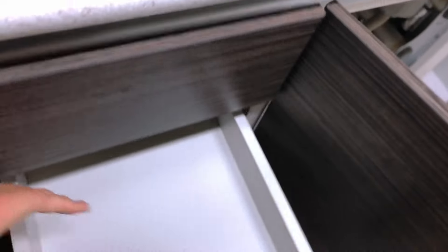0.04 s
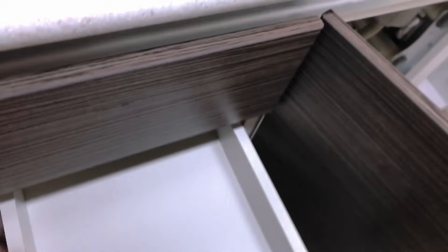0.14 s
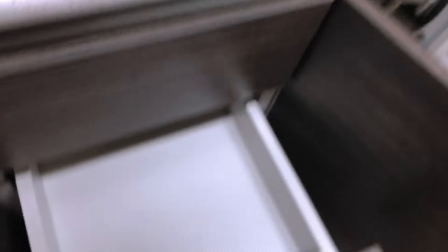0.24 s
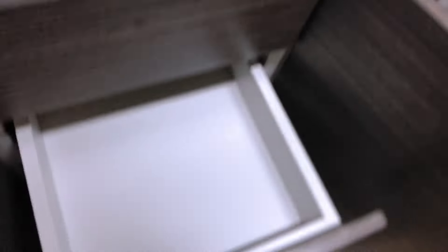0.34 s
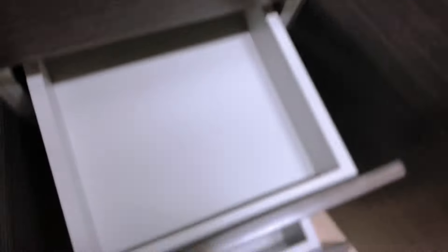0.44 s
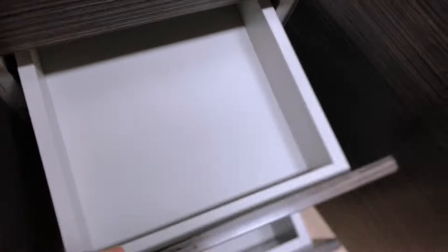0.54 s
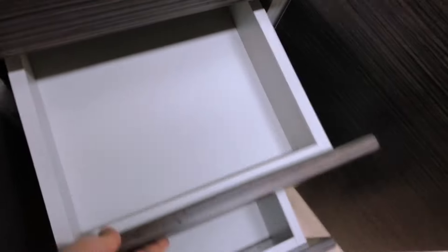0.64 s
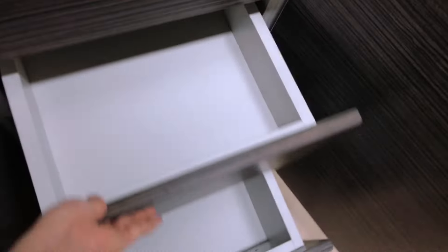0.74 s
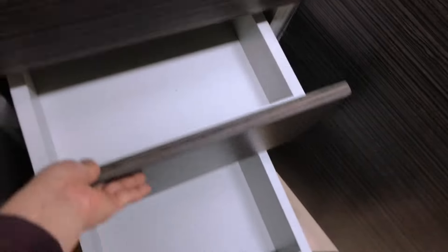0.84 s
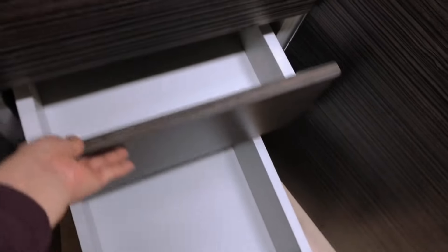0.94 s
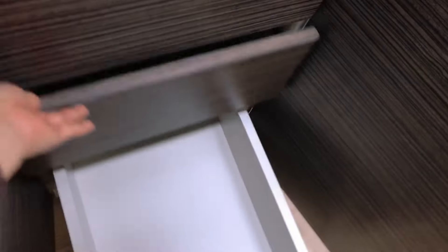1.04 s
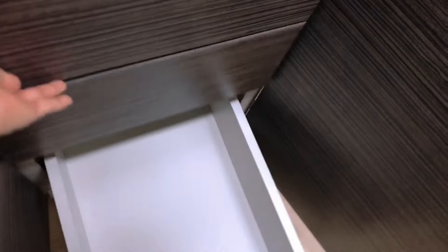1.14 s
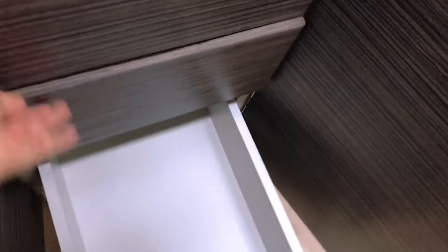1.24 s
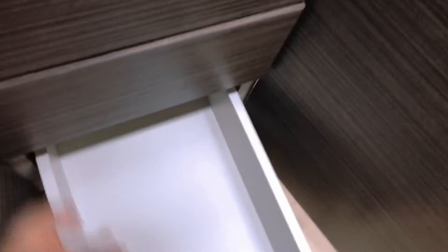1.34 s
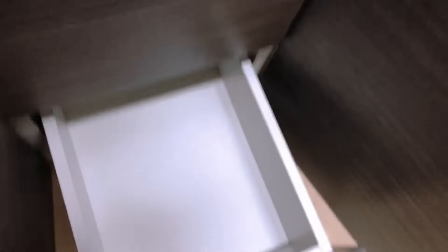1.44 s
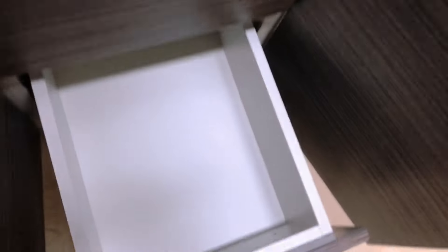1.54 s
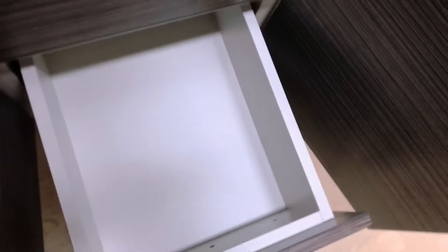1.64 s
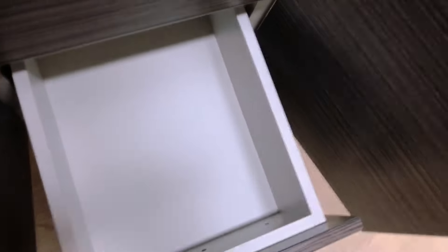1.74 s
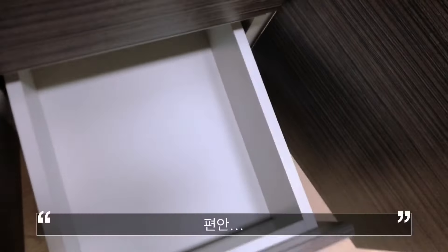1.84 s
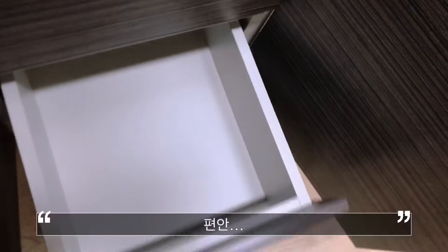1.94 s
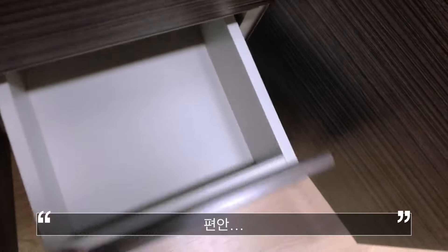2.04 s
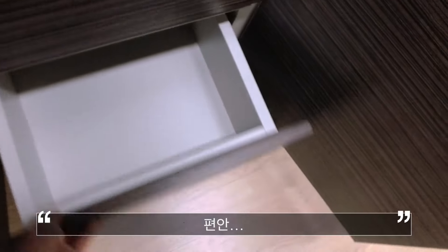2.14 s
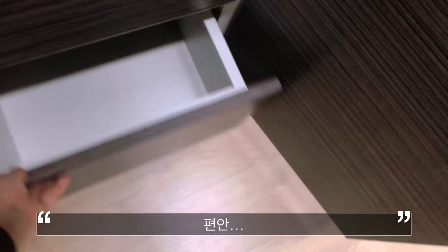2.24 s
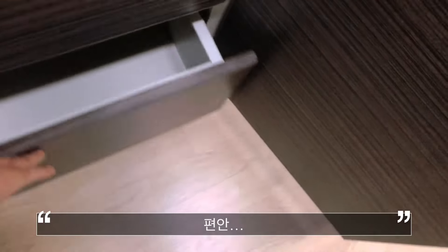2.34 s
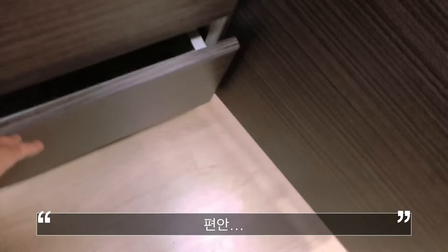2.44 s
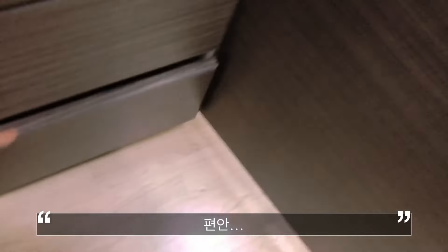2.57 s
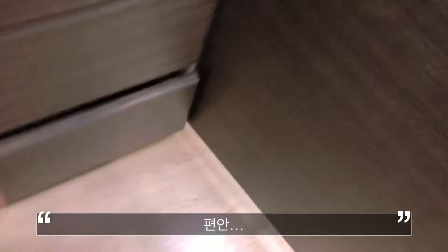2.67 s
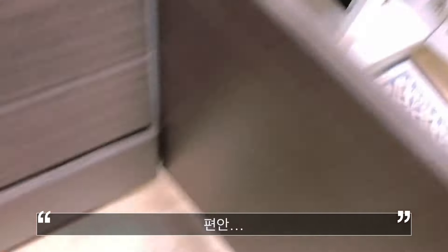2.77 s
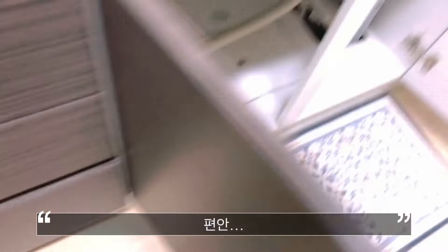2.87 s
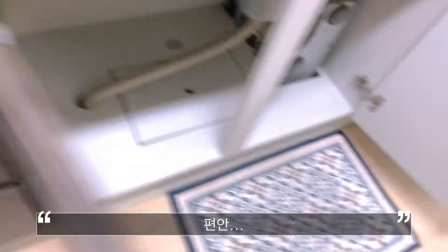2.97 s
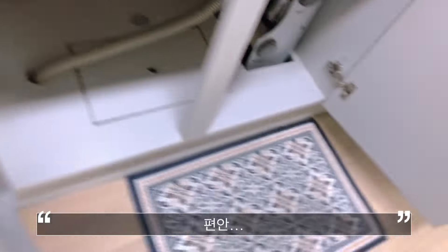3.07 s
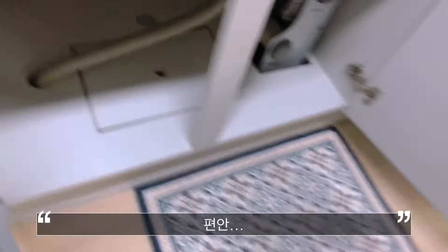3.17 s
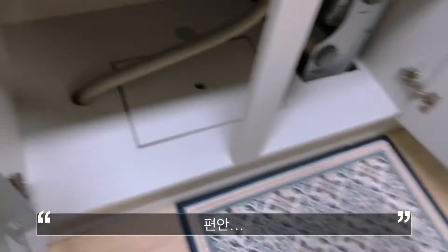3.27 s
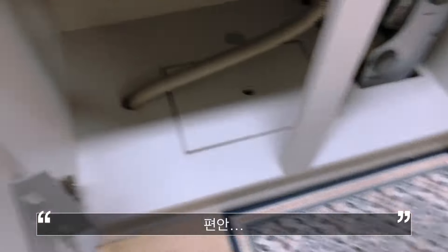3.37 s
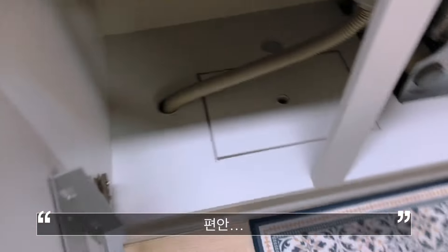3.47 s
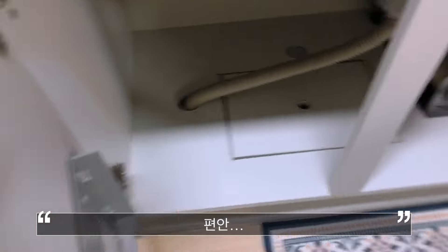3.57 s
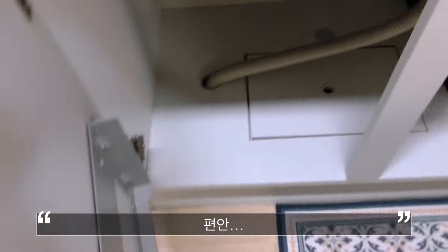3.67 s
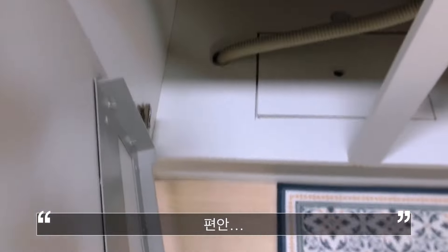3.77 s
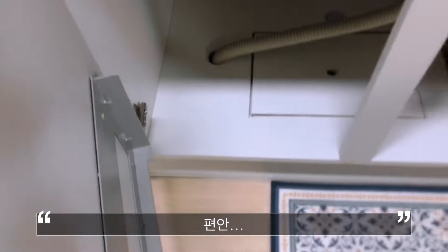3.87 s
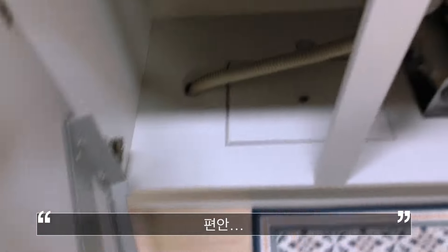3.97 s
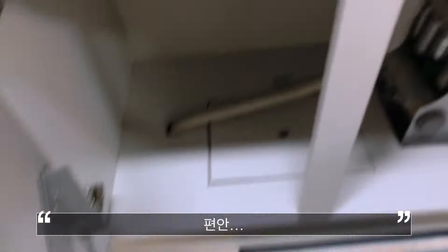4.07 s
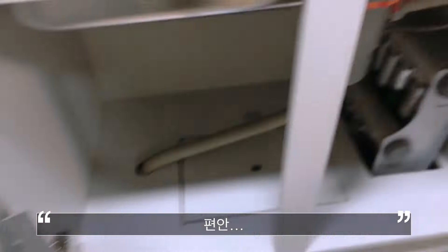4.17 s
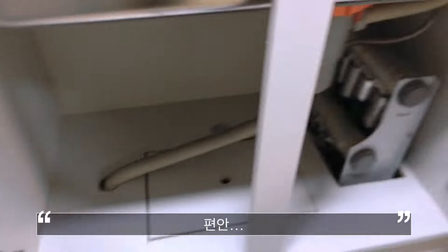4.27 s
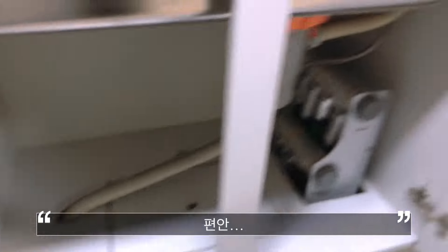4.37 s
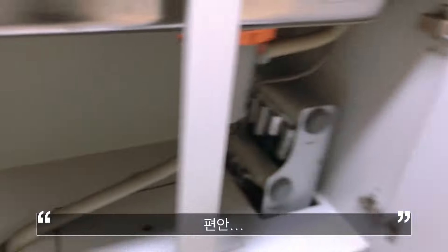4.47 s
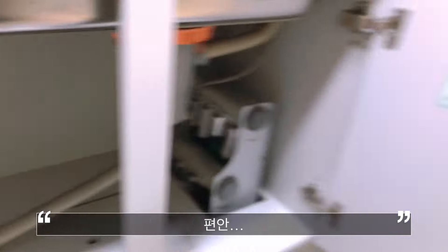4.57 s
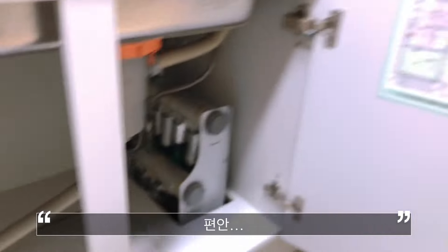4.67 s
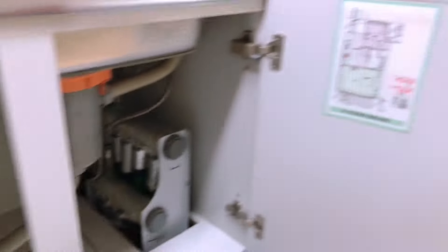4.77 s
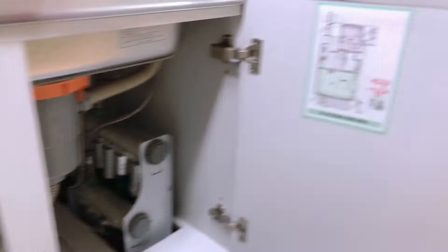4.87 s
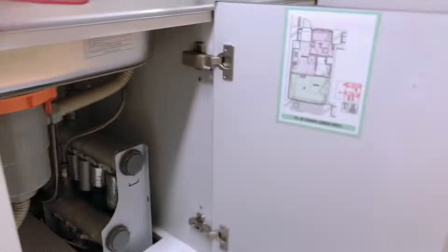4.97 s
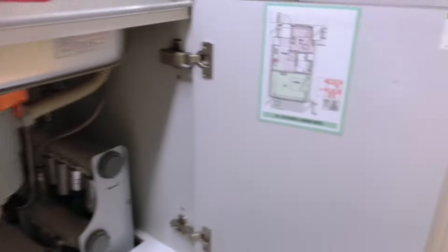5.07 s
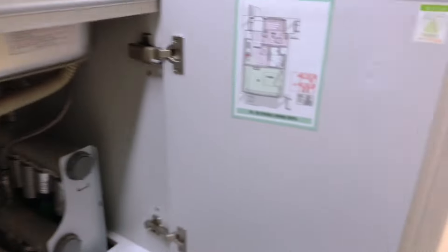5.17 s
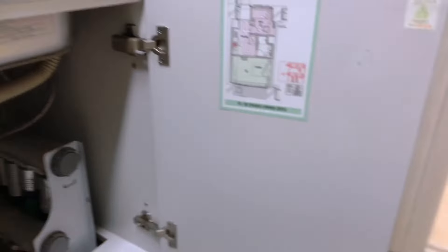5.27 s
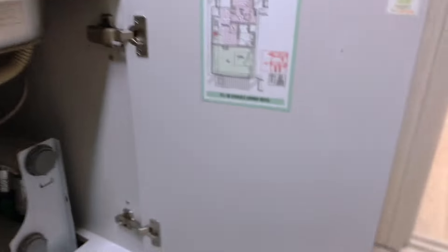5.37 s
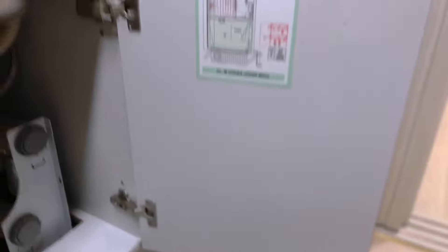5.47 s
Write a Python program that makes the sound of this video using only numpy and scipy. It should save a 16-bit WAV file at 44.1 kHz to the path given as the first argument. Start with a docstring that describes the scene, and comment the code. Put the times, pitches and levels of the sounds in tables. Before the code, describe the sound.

Close-up drawer closing in a bare apartment: rolling rumble, runner ticks, loud bangs of panel and metal, then quiet rustling and room hum.

```python
"""Kitchen drawers pushed shut

Three empty drawers are pushed shut by hand, close to a phone, in a bare apartment. Rollers bump along the
runners (dense impulses into modes), runners tick and fronts slam (struck steel and panel modes, noise cracks).
Feet and clothes rustle (grainy noise) over the hum of the flat (coloured noise, wavering tones).
"""
import sys
import numpy as np
from scipy import signal
from scipy.fft import rfft, irfft
from scipy.io import wavfile
from scipy.ndimage import uniform_filter1d

SR = 44100
rng = np.random.default_rng(int(sys.argv[2]) if len(sys.argv) > 2 else 0)


def gain_from_decibels(decibels):
    """Convert decibel values to linear amplitude factors."""
    exponent = np.asarray(decibels, float) / 20
    return 10 ** exponent


def int16_out(signal):
    """Quantize to a 16-bit WAV file."""
    q = np.round(np.clip(np.atleast_2d(signal).T, -1, 1) * 32767)
    wavfile.write(sys.argv[1], SR, q.astype(np.int16))


N = 242991
T_S = np.arange(N) / SR

# hum of the flat, spectral shape: freq_hz, density_db_per_hz
FLAT_SPECTRUM = [(18, -14), (30, 7.5), (64, 4), (138, -7.5), (189, -6.5), (394, -4.5), (499, -16.5),
                 (600, -16), (889, -19), (1010, -16.5), (2230, -22.5), (2610, -26.5), (3220, -31),
                 (14000, -43.5), (16000, -43.5)]
FLAT_RMS_DB = -51.5
# steady appliance tones: freq_hz, rms_db
APPLIANCE_TONES = [(183, -63.5), (608, -70), (2584, -75)]

# brushes of feet and clothes: start_s, length_s, peak_level_db, fine_treble_re_level_db
BRUSHES = [(0.0, 0.37, -59.5, -14), (0.547, 0.65, -65.5, -8.5), (0.782, 0.76, -59, -14),
           (1.534, 0.29, -65, 4), (1.765, 0.75, -61.5, -23), (2.206, 0.3, -63.5, -21),
           (2.502, 0.21, -52, -21.5), (2.856, 0.27, -62.5, -5), (3.142, 0.14, -49, -8.5),
           (3.346, 0.091, -61.5, -4.5), (3.442, 0.17, -65, 2), (3.806, 0.17, -68, -7),
           (4.035, .17, -51, -5), (4.201, 0.14, -64, -7), (4.36, 0.31, -67, -11.5), (4.72, 0.076, -78, -8),
           (4.835, 0.25, -70.5, -9), (5.06, 0.099, -76, -10), (5.325, 0.2, -68.5, -27)]
# cloth, spectral shape: freq_hz, density_db_per_hz
CLOTH_SPECTRUM = [(710, -39), (1200, -12), (1660, 8.5), (2860, 5), (3010, 9.5), (3220, 8.5), (9310, -0.5),
                  (14400, -25), (16000, -27.5)]
# footfalls and shifts of weight: start_s, peak_rumble_db
FOOTFALLS = [(0.66, -60), (1.47, -60), (2.04, -47), (2.23, -43), (2.98, -52.5), (3.5, -50), (4.34, -54.5),
             (5.06, -58)]

# kitchen reverberation: freq_hz, t60_s, tail_re_direct_db (before the wet_db of each sound)
KITCHEN_DECAY = [(60, 1, 5), (155, 0.22, -16), (400, 0.24, 4), (1500, 0.25, 0), (5000, 0.2, -2.5),
                 (14000, 0.21, -3)]
# chipboard panel modes: freq_hz, relative_db, t60_s
PANEL_MODES = [(81.3, 0.5, 0.18), (101, -1.5, 0.22), (126.5, -1, 0.27), (155, 1.5, .15), (193.3, 3.5, 0.11),
               (226, -13, 0.43), (244.3, 2.5, 0.061), (289.6, 5.5, 0.085), (312.7, -6, 0.21),
               (363, 4, 0.083), (444, 3, 0.077), (517, -3, 0.064), (626.5, -10, 0.19), (736, -7, 0.027)]
# steel runner modes: freq_hz, relative_db, t60_s
RUNNER_MODES = [(851, -5, 0.056), (890, -2, 0.0047), (972, 4, 0.011), (1265, 1, 0.017), (1400, 3.5, 0.023),
                (1500, -1, 0.04), (1622, -5.5, 0.036), (2010, -2.5, 0.011), (2079, -8, 0.014),
                (2055, 4, 0.022), (2480, 3.5, 0.013), (2780, -3, 0.038), (3030, 6, 0.0083),
                (3455, -0.5, 0.024), (3880, -1.5, 0.013), (4700, 4.5, 0.0046)]
# crack of a contact, spectral shape before tilt: freq_hz, density_db_per_hz
CRACK_SPECTRUM = [(350, -13), (600, -12), (1470, -15), (1730, -13), (2070, -11.5), (3210, -11),
                  (5870, -14.5), (14700, -27.5), (16000, -49)]

# rollers bearing on the track, one list per stretch: time_s, box_rumble_db, runner_grind_db
ROLL_STRETCHES = [
    [(0.0, -43.5, -45.5), (0.07, -46, -57), (0.27, -43.5, -50), (0.33, -48, -60), (0.4, -50, -73),
     (0.5, -66, -80)],
    [(0.574, -39, -54), (0.64, -53.5, -63), (0.75, -39, -55.5), (0.86, -39, -54), (0.9, -43, -72),
     (0.945, -33.5, -51), (1.03, -40, -56.5), (1.14, -42.5, -50), (1.33, -43.5, -57), (1.41, -75, -84)],
    [(1.52, -41, -53), (1.6, -81, -83), (1.66, -46.5, -74), (1.72, -77, -76)],
    [(1.754, -40, -67), (1.866, -45.5, -77), (1.92, -38.5, -53), (2.11, -39.5, -47), (2.21, -42, -50.5),
     (2.31, -39, -48), (2.44, -46, -66), (2.53, -48, -43), (2.74, -44, -55), (2.84, -75, -89)],
    [(2.91, -55, -67), (3.0, -46, -58), (3.12, -79, -83), (3.2, -74, -71)],
]
# ticks of runners and catches: start_s, ring_peak_db, favoured_ring_hz, crack_db
TICK_EVENTS = [(0.043, -41.5, 3030, -51), (0.2634, -37, 1400, -51.5), (0.32, -45, 2450, -50.5),
               (0.596, -47, 2430, -48), (0.632, -60, 2520, -52.5), (0.71, -65, 1530, -56),
               (0.7557, -35, 3400, -47), (0.833, -43, 2340, -33), (0.888, -56.5, 3190, -40),
               (0.9171, -23.5, 2480, -33.5), (0.9894, -38.5, 2480, -49), (1.042, -31, 3500, -29.5),
               (1.6314, -36.5, 1400, -53), (1.7474, -21, 1620, -68), (1.779, -27.5, 1530, -71),
               (1.8065, -31, 1610, -70), (1.834, -25.5, 1560, -58), (1.912, -30.5, 1500, -66),
               (1.943, -30.5, 1340, -64), (1.977, -37, 1410, -54), (2.0753, -29.5, 1500, -41.5),
               (2.119, -38, 1330, -72), (2.151, -31.5, 2060, -79.5), (2.1854, -30.5, 1400, -36),
               (2.253, -34, 3760, -42), (2.269, -25, 2780, -48), (2.316, -41, 1500, -49),
               (2.33, -33, 3990, -37), (2.374, -33, 1740, -58), (2.511, -43, 1340, -41.5),
               (3.0178, -26, 1903, -58), (5.2951, -48, 2570, -75), (5.412, -40, 3100, -67)]
# slams and heavy knocks: start_s, ring_peak_db, favoured_ring_hz, ring_narrowness_db_per_octave,
# thud_db, favoured_thud_hz, crack_db
KNOCK_EVENTS = [(0.09, -10.5, 1500, 18, -18, 153, -10.5), (0.352, -25.5, 1430, 14, -38.5, 390, -32.5),
                (0.796, -15, 2520, 7, -23.5, 139, -22), (1.157, -9, 1360, 5, -18, 287, -12),
                (1.441, -24, 1870, 2.5, -29.5, 276, -31.5), (1.73, -29.5, 1450, 0, -39.5, 370, -40),
                (2.556, -10.5, 1920, 38, -16.5, 220.5, -12.5), (2.932, -16.5, 2600, 6, -36, 493, -27.5)]


def unit(x):
    """Scale to rms 1."""
    return x / np.sqrt(np.mean(x ** 2))


def at(freq_hz, table):
    """Read a table of (freq_hz, value) on a log-frequency axis."""
    table_hz, value = np.transpose(table)
    return np.interp(np.log(np.maximum(freq_hz, 1)), np.log(table_hz), value)


def colour(x, spectrum):
    """Filter by a spectrum of (freq_hz, db)."""
    gain = gain_from_decibels(at(np.fft.rfftfreq(len(x), 1 / SR), spectrum))
    return irfft(rfft(x) * gain, len(x))


def walk(rate_hz):
    """Random levels held for 1 / rate_hz and slewed twice; spread near 1."""
    hold = int(SR / rate_hz)
    steps = np.repeat(rng.standard_normal(N // hold + 1), hold)
    return 0.65 * uniform_filter1d(uniform_filter1d(steps, hold), hold)[:N]


def curves(rows):
    """Level columns of a (time_s, db, ..) table as gains at every sample."""
    time_s, *levels_db = np.transpose(rows)
    return [gain_from_decibels(np.interp(T_S, time_s, db)) for db in levels_db]


def swell(rows, rise_s):
    """Summed gain of (start_s, peak_db) events that rise for rise_s, then die away exponentially."""
    start_s, peak_db = np.transpose(rows)[:, :, None]
    u = np.maximum(T_S - start_s, 0) / rise_s
    return np.sum(gain_from_decibels(peak_db) * u * np.exp(1 - u), axis=0)


def shaken(re_thud_db, rise_s):
    """Gain of something heavy that every knock sets swaying, in proportion to its thud."""
    start_and_thud = np.array(KNOCK_EVENTS)[:, [0, 4]]
    return swell(start_and_thud + [0, re_thud_db], rise_s)


def flat():
    """Ventilation and far traffic as coloured noise, with a few appliance tones that waver."""
    air = unit(colour(rng.standard_normal(N), FLAT_SPECTRUM)) * gain_from_decibels(FLAT_RMS_DB + 0.27 * walk(2.7))
    tones = 0
    for hz, rms_db in APPLIANCE_TONES:
        tones = tones + gain_from_decibels(rms_db + 1.17 * walk(5.9)) * np.sqrt(2) * np.sin(2 * np.pi * hz * T_S)
    return air + tones


def person():
    """Fabric and soles brush in fine grains; the floor gives under shifting weight and after each knock."""
    peak_place, edge_power = 0.4, 1.52  # fraction of a brush, steepness of its edges
    stir_db, standing_db = -85, -65  # steady cloth and floor levels under the events

    grains = rng.standard_normal(N) * gain_from_decibels(2.0 * walk(250) + 0.55 * walk(30))
    fine = colour(grains, [(5000, -12.0), (9000, -6.5), (12000, -4.5), (15000, -3), (16500, -10)])
    floor = colour(rng.standard_normal(N), [(15, -42.5), (30, -11.0), (45, 5.5), (65, -1), (100, -4), (200, -85.0)])

    start_s, length_s, level_db, fine_db = np.transpose(BRUSHES)[:, :, None]
    # warp time so that the half sine peaks at peak_place
    u = np.clip((T_S - start_s) / length_s, 0, 1) ** (np.log(0.5) / np.log(peak_place))
    brush = gain_from_decibels(level_db) * np.abs(np.sin(np.pi * u)) ** edge_power
    cloth_gain = brush.sum(axis=0) + gain_from_decibels(stir_db)
    fine_gain = (brush * gain_from_decibels(fine_db)).sum(axis=0) + gain_from_decibels(stir_db - 8.5)

    weight = swell(FOOTFALLS, rise_s=0.074) + shaken(re_thud_db=-15.5, rise_s=0.056) + gain_from_decibels(standing_db)
    return cloth_gain * unit(colour(grains, CLOTH_SPECTRUM)) + fine_gain * unit(fine) + weight * unit(floor)


def kitchen(x, wet_db=0, size=16384):
    """Bare walls: a diffuse tail in octave bands, each with its own decay; wet_db offsets the tail level."""
    t_s = np.arange(size) / SR
    freq_hz = np.maximum(np.fft.rfftfreq(size, 1 / SR), 1)
    centre_hz = 62.5 * 2 ** np.arange(9)[:, None]
    share = np.clip(1 - np.abs(np.log2(freq_hz / centre_hz)), 0, 1)
    table = np.array(KITCHEN_DECAY)
    t60_s = at(centre_hz, table[:, :2])
    # the root makes the level that of the whole decay's energy
    gain = gain_from_decibels(at(centre_hz, table[:, ::2])) * np.sqrt(2 * np.log(1000) / t60_s / SR)
    bands = irfft(rfft(rng.standard_normal(size)) * share, size) * gain * 1000. ** (-t_s / t60_s)
    # reflections build up over 5.7 ms; a negative wet_db makes the sound drier
    response = gain_from_decibels(wet_db) * bands.sum(axis=0) * np.clip(t_s / 0.0057, 0, 1)
    response[0] = 1  # direct sound
    return signal.fftconvolve(x, response)


def spread(x):
    """A slam travels through the carcass: successive milliseconds radiate from other spots, reflected anew."""
    t_s = np.arange(len(x)) / SR
    centres_s = np.array([0, .002, .004, .007, .011, .016, .024])
    return sum(kitchen(x * np.interp(t_s, centres_s, spot)) for spot in np.eye(len(centres_s)))


def lean(modes, favoured_hz, db_per_octave):
    """Modes far from the favoured pitch are excited less."""
    return -db_per_octave * np.abs(np.log2(np.array(modes)[:, 0] / favoured_hz))


def ring(modes, lean_db=0, scatter_db=0, size=8192):
    """Impulse response of decaying modes; neighbours move in opposite sense, scatter excites them unevenly."""
    t_s = np.arange(size) / SR
    hz, db, t60_s = np.transpose(modes)[:, :, None]
    sense = (-1.) ** np.arange(len(modes))[:, None]
    gain = gain_from_decibels(db + np.reshape(lean_db, (-1, 1)) + scatter_db * rng.standard_normal((len(modes), 1)))
    return np.sum(sense * gain * np.sin(2 * np.pi * hz * t_s) * 1000. ** (-t_s / t60_s), axis=0)


def rolling():
    """Rollers bump over uneven track: dense small impacts into carcass panels, drawer box and runners."""
    carcass_re_box_db = -2
    carcass = ring(PANEL_MODES[:4])
    box = ring(PANEL_MODES[4:], lean(PANEL_MODES[4:], 210., db_per_octave=6.0))
    # plastic rollers are soft, so they reach mostly the lower runner modes
    runners = ring(RUNNER_MODES, lean(RUNNER_MODES, 1380.0, db_per_octave=3.0))

    box_gain, grind_gain = curves(np.concatenate(ROLL_STRETCHES))
    carcass_gain = gain_from_decibels(carcass_re_box_db) * box_gain + shaken(re_thud_db=-15, rise_s=0.038)
    out = 0
    for gain, body in [(carcass_gain, carcass), (box_gain, box), (grind_gain, runners)]:
        hit = rng.random(N) < .025  # chance per sample
        bumps = rng.standard_normal(N) * gain_from_decibels(2.0 * rng.exponential(size=N)) * hit
        uneven = bumps * gain_from_decibels(6.3 * walk(45))
        out = out + gain * unit(signal.fftconvolve(uneven, body)[:N])
    return kitchen(out, wet_db=-3.0)[:N]


def strike(ring_db, ring_hz, crack_db, tilt_db_per_octave, rattle_decay_s, narrow_db, loose, size=8192):
    """A first contact and a short rattle ring the runner near its favoured mode and crack in the treble."""
    fade = np.exp(-np.arange(size) / SR / rattle_decay_s)
    contact = loose * rng.standard_normal(size) * fade / np.linalg.norm(fade)
    contact[0] = 1
    modes = ring(RUNNER_MODES, lean(RUNNER_MODES, ring_hz, narrow_db), scatter_db=4.5)
    steel = signal.fftconvolve(contact, modes)[:size]
    # a positive tilt brightens the crack
    tilted = [(hz, db + tilt_db_per_octave * np.log2(hz / 6000)) for hz, db in CRACK_SPECTRUM]
    crack = unit(colour(rng.standard_normal(size), tilted)) * fade
    return gain_from_decibels(ring_db) * steel / np.abs(steel).max() + gain_from_decibels(crack_db) * crack


def thud(rms_db, favoured_hz, size=8192):
    """A soft push of the front against the carcass; the panels take some milliseconds to swing up."""
    t_s = np.arange(size) / SR
    modes = ring(PANEL_MODES, lean(PANEL_MODES, favoured_hz, db_per_octave=9), scatter_db=1.5)
    wood = modes * (1 - np.exp(-t_s / 0.0027))
    return gain_from_decibels(rms_db) * wood / np.std(wood[:SR // 40])  # level over the first 25 ms


def add(out, x, start_s):
    """Mix x into out from start_s."""
    i = int(start_s * SR)
    out[i:i + len(x)] += x[:len(out) - i]


def blows():
    """Every knock and tick of the drawers, each with its own reflections in the kitchen."""
    out = np.zeros(N)
    for start_s, ring_db, ring_hz, narrow_db, thud_db, thud_hz, crack_db in KNOCK_EVENTS:
        steel = strike(ring_db, ring_hz, crack_db, tilt_db_per_octave=-2, rattle_decay_s=0.0084,
                       narrow_db=narrow_db, loose=.9)
        wood = kitchen(thud(thud_db, thud_hz), wet_db=-5.5)
        add(out, spread(steel) + wood, start_s)
    for start_s, ring_db, ring_hz, crack_db in TICK_EVENTS:
        tick = strike(ring_db, ring_hz, crack_db, tilt_db_per_octave=2.5, rattle_decay_s=0.0078,
                      narrow_db=13, loose=.45)
        add(out, kitchen(tick, wet_db=-2.5), start_s)
    return out


def scene():
    """The flat behind, the person beside the phone, the drawers in the kitchen."""
    return (flat() + person() + rolling() + blows())[None]


def roll_off(x):
    """The treble ends steeply here."""
    return signal.sosfilt(signal.butter(12, 16550, fs=SR, output="sos"), x)


def record(dry):
    """The phone rounds the loudest peaks and drops the deepest bass."""
    rounded = 0.62 * np.tanh(dry / 0.64)
    highpass = signal.butter(2, 35., "high", fs=SR, output="sos")
    mix = signal.sosfilt(highpass, rounded)
    return roll_off(mix)


dry = scene()
out = record(dry)
int16_out(out)
```